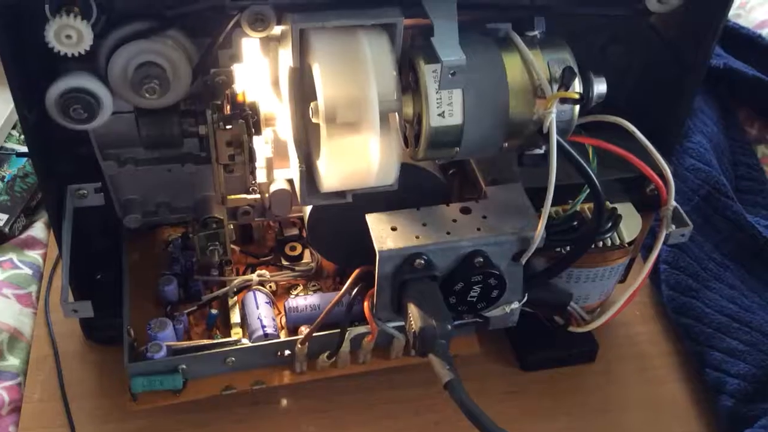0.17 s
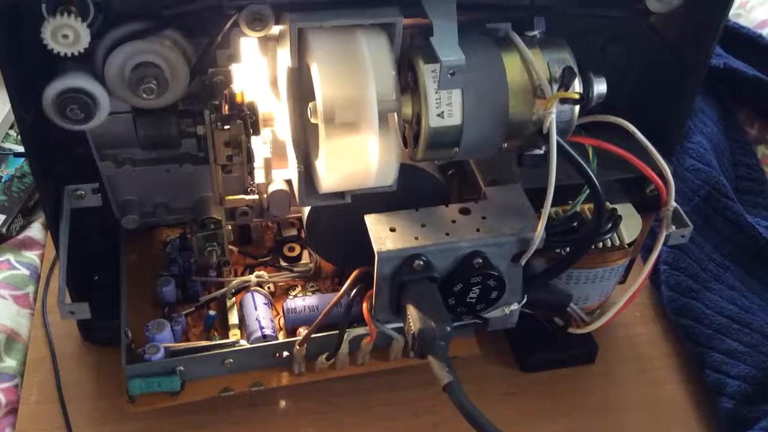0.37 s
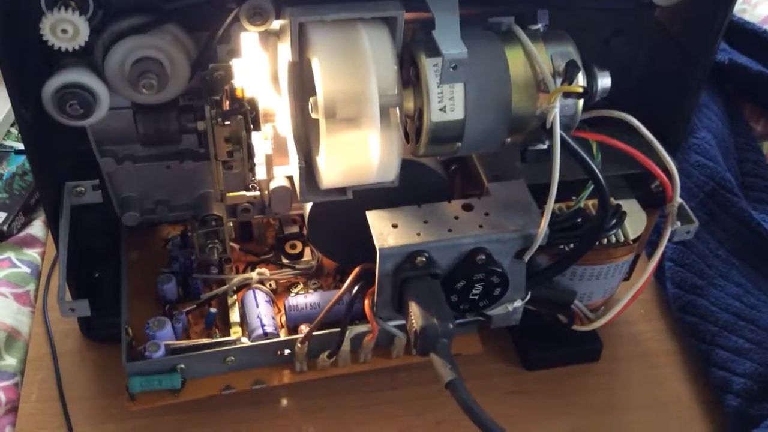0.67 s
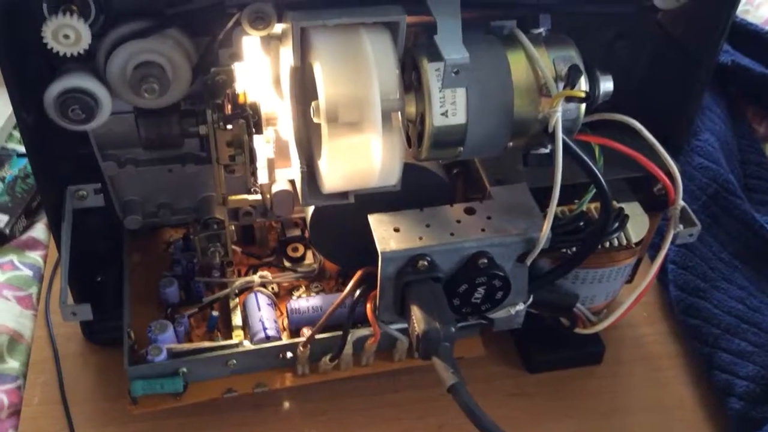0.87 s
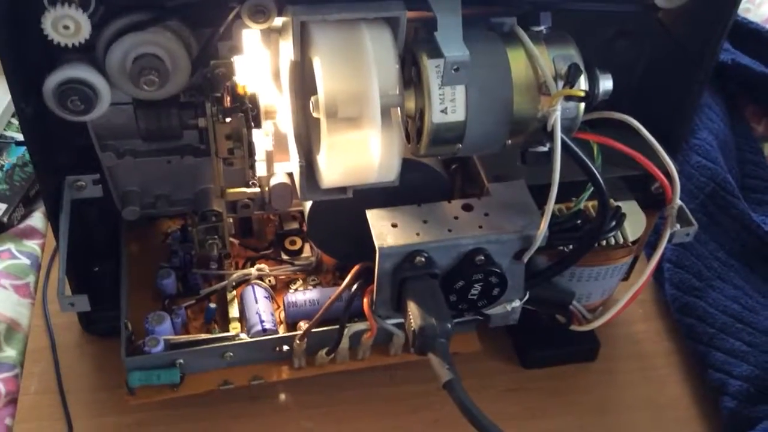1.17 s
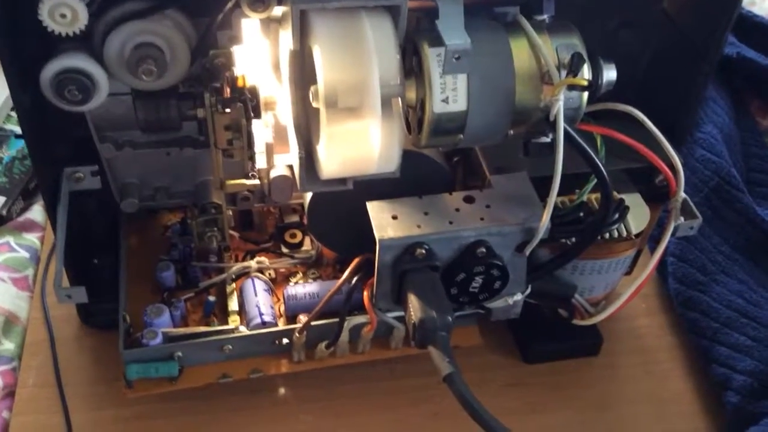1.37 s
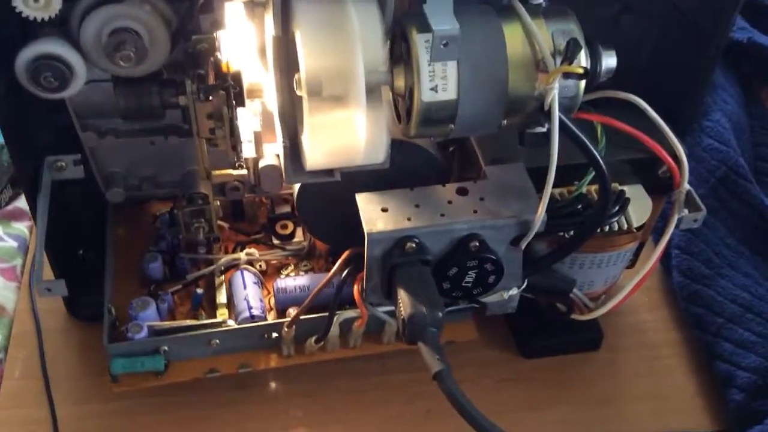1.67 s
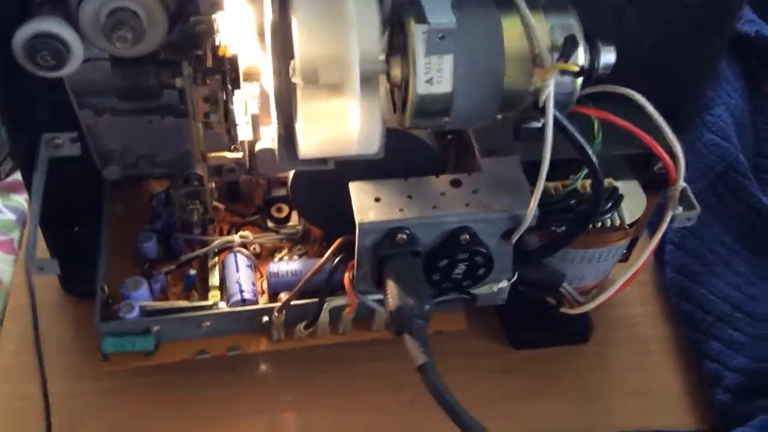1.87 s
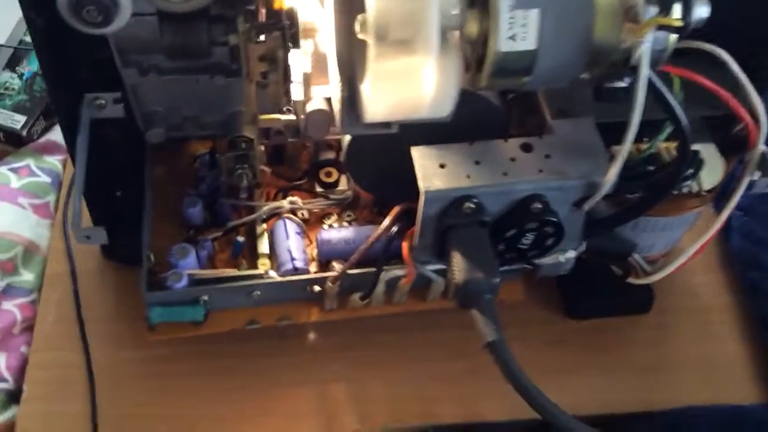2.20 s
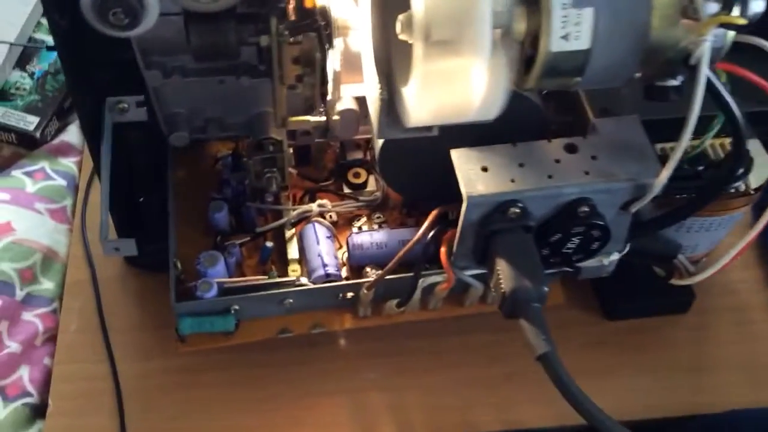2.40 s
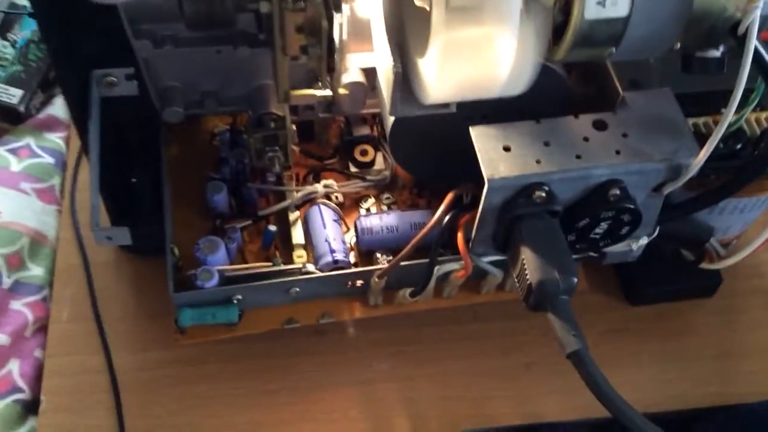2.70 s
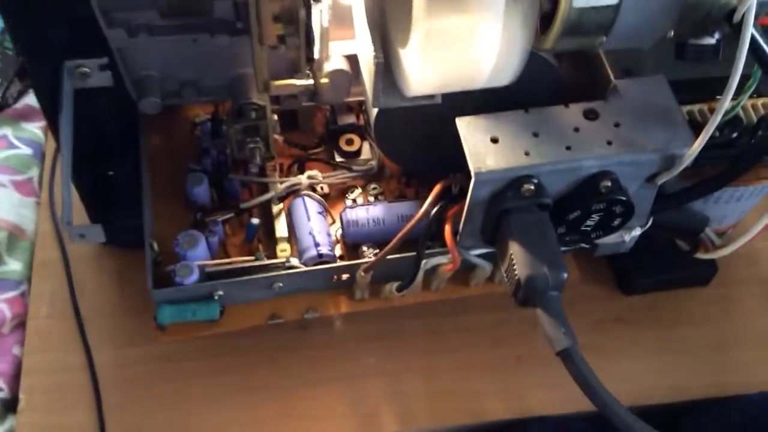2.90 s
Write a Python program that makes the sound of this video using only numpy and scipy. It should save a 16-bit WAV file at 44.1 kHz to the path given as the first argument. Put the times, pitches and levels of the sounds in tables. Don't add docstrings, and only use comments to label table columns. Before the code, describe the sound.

An open film projector chatters rapidly and evenly, about 24 bright metallic clicks a second, over gear whine, cam rumble and fan hiss; small room, close phone microphone moving nearer near the end.

```python
import sys
import numpy as np
from scipy import signal
from scipy.fft import rfft, irfft
from scipy.io import wavfile
from scipy.ndimage import uniform_filter1d, map_coordinates

SR = 44100
rng = np.random.default_rng(int(sys.argv[2]) if len(sys.argv) > 2 else 0)


def field_ratio(decibels):
    return 10 ** (np.asarray(decibels, dtype=float) / 20)


def wav_record(signal):
    frames = np.transpose(np.atleast_2d(signal))
    bounded = np.clip(frames, -1, 1)
    quanta = np.round(bounded * 32767).astype(np.int16)
    wavfile.write(sys.argv[1], SR, quanta)


N = 134505
TURN_S = .0419177


def level(x, db):
    return x * field_ratio(db) / np.sqrt(np.mean(x ** 2))


def ring(x, hz, t60):
    radius = np.exp(-np.log(1000) / (t60 * SR))
    angle = 2 * np.pi * hz / SR
    return signal.lfilter([1, 0, -1], [1, -2 * radius * np.cos(angle), radius * radius], x)


def colour(x, points):
    hz, db = np.transpose(points)
    f = np.fft.rfftfreq(len(x), 1 / SR) + 1
    return irfft(rfft(x) * field_ratio(np.interp(np.log(f), np.log(hz), db)), len(x))


def walk(rate):
    hold = int(SR / rate)
    steps = np.repeat(rng.standard_normal(N // hold + 1), hold)
    return 1.5 * uniform_filter1d(uniform_filter1d(steps, hold), hold)[:N]


# multiple of the tooth rate, level in dB rms.
WHINE = [(1, -55), (2, -70.5)]


def gear_whine(turn, near):
    teeth = 43
    out = np.zeros(N)
    for multiple, db in WHINE:
        swell = field_ratio(db + 2.5 + 4.6 * near + 0.72 * walk(16))
        out += swell * np.sin(2 * np.pi * multiple * teeth * turn)
    return out


# pitch in Hz, level in dB rms, width in Hz.
MOTOR = [(1075.3, -64, 8), (4950, -63, 130), (5750, -66, 140), (3050, -70, 90), (3520, -70, 90),
         (6950, -69, 90)]


def motor():
    out = np.zeros(N)
    for hz, db, width in MOTOR:
        t60 = np.log(1000) / np.pi / width
        out += level(ring(rng.standard_normal(N), hz, t60), db)
    return out


# frequency in Hz, level in dB per Hz.
CAMS = [(250, -21), (370, -4), (480, -16.5), (620, -4.5), (770, -9.5), (930, 2), (1300, -15), (2600, -21.5)]


def cam_rumble(turn, near):
    played = []
    for _ in range(2):
        outline = colour(irfft(np.exp(2j * np.pi * rng.random(925))), CAMS)
        played.append(map_coordinates(outline, [turn % 1 * len(outline)], mode="grid-wrap"))
    return level(played[0] + 0.22 * walk(4.77) * played[1], -51.5) * field_ratio(3.6 * near)


def drive(t, near):
    turn = t / TURN_S + 0.00098 * walk(5.2)
    return gear_whine(turn, near) + motor() + cam_rumble(turn, near)


# frequency in Hz, level in dB per Hz.
FAN = [(25, 2), (50, -0.5), (190, 0.5), (280, -4.5), (1400, -6), (2300, -11.5), (6000, -14), (15500, -19.5)]


def fan():
    air = rfft(colour(rng.standard_normal(N), FAN))
    octave = np.log2(np.fft.rfftfreq(N, 1 / SR) + 1)
    out = np.zeros(N)
    for centre in range(4, 16):
        band = np.clip(1 - abs(octave - centre), 0, 1) ** .5
        out += field_ratio(1.4 * walk(24.88)) * irfft(air * band, N)
    return level(out, -50)


# time in ms after the strike, level in dB.
CONTACTS = [
    (-.9, -18),
    (-.4, -9),
    (-.05, 0),
    (.45, 0),
    (1., -5),
    (1.6, -3),
    (3.1, -9),
    (4.4, -14),
    (5.5, -14),
    (7.3, -15),
]


def strikes():
    first_s, wander_s = .0947, .00008
    contact_ms, slide_ms, slide_db, scatter_db = .16, 2.4, -29, 1.
    same_share = .85
    lift_db_per_ms = .6

    ms = np.arange(-256, 512) * 1000 / SR
    turns = int(N / SR / TURN_S) + 1
    chance = rng.standard_normal((turns, len(CONTACTS)))
    env = field_ratio(slide_db) * np.exp(-abs(ms) / slide_ms)
    for k, (at, db) in enumerate(CONTACTS):
        bounce = np.exp(-((ms - at) / contact_ms) ** 2)
        env = env + field_ratio(db + scatter_db * chance[:, k:k + 1]) * bounce

    same = np.sign(rng.standard_normal(len(ms)))
    drift = np.sqrt(2) * uniform_filter1d(rng.standard_normal(env.shape), size=2, axis=0)
    force = env * (np.sqrt(same_share) * same + np.sqrt(1 - same_share) * drift)
    lift_db = np.array([0 * ms, lift_db_per_ms * np.clip(ms, -2, 8)])
    force = force[:, None] * field_ratio(lift_db)

    out = np.zeros((2, N + 4096))
    late = wander_s * walk(5)
    for k in range(turns):
        at = first_s + k * TURN_S
        i = int(round((at + late[min(int(at * SR), N - 1)]) * SR)) - 256
        out[:, i:i + len(ms)] += force[k]
    return out[:, :N]


def body(force, modes, near):
    out = np.zeros(N)
    for k, (hz, db, t60, gain_db) in enumerate(modes):
        swell = field_ratio(db + gain_db * near + 0.95 * walk(9.85))
        out += (-1) ** k * swell * level(ring(force, hz, t60), 0)
    return out


# pitch in Hz, level in dB, t60 in seconds, gain in dB when near.
CLAW = [(5560, -17, 0.0095, 15.5), (5920, -8.5, 0.015, 4.5), (6240, -8, 0.013, 4.5), (6596, 1, 0.0063, 1.5),
        (6930, 2.5, 0.01, -2.5), (7410, -9.5, 0.02, 5), (7857, -1.5, 0.0054, -3.5), (9620, -11, 0.0049, 6),
        (10580, -12, 0.0063, 7.5), (11610, -7, 0.0035, 3.5), (12380, -9, 0.0055, -2),
        (13500, -11, 0.0049, 5), (14100, -8.5, 0.0056, 0), (14700, -6.5, 0.0047, -2)]
FRAME = [(977, -15, 0.053, 10), (1530, -11, 0.027, 4), (2000, -14, 0.0074, 7.5), (2725, -13, 0.011, 5),
         (2950, -7, 0.066, -2.5), (3280, -6.5, 0.026, 4), (3558, -5.5, 0.02, 1.5), (3970, -9.5, .014, 3),
         (4527, -5, 0.013, 0), (4930, -6.5, 0.024, 3.5), (5350, -10, 0.0071, -2)]


def clatter(near):
    force, shake = strikes()
    claw = field_ratio(-46) * body(force, CLAW, near)

    frame_late_ms = 0.772
    late = map_coordinates(shake, [np.arange(N) - frame_late_ms * SR / 1000], order=1)
    no_bass = signal.butter(2, 700, "highpass", fs=SR, output="sos")
    frame = field_ratio(-51) * signal.sosfilt(no_bass, body(late, FRAME, near))

    crack_hz = 11060
    crack_band = signal.butter(2, [crack_hz * .4, crack_hz * 1.33], "bandpass", fs=SR)
    crack = level(signal.lfilter(*crack_band, force), -51.5)
    return claw + frame + crack


def room(hits, t):
    room_db, t60_s, rise_s = -14, 0.04, 0.0013
    t = t[:9000]
    tail = rng.standard_normal(9000) * field_ratio(-60 * t / t60_s) * np.clip(t / rise_s, 0, 1)
    return signal.fftconvolve(hits, level(tail, room_db) / np.sqrt(9000))[:N]


# middle in seconds, length in seconds, level in dB, pitch in Hz.
HUMS = [
    (0.124, 0.064, -57.5, 122.5),
    (0.442, 0.084, -57, 125),
    (0.603, 0.056, -63, 161),
    (1.694, 0.027, -49, 180),
    (1.757, 0.024, -57, 185),
    (2.045, .12, -56, 180),
    (2.326, 0.096, -60.5, 170.3),
    (2.55, 0.032, -57, 180),
    (2.783, 0.045, -53, 180),
    (2.873, .05, -54, 185),
]


def table(t):
    out = np.zeros(N)
    for at, length, db, hz in HUMS:
        out += field_ratio(db + 4) * np.exp(-((t - at) / length * 2) ** 2) * np.sin(2 * np.pi * hz * t)

    bump_s, bump_ms, bump_db = 1.0157, .7, -34
    u = (t - bump_s) * 1000 / bump_ms
    push = np.exp(np.minimum(u, 0))
    recoil = np.exp(-(u * 3) ** 2) - .5 * u * np.exp(-np.maximum(u, 0))
    return out + field_ratio(bump_db) * np.where(u < 0, push, recoil)


# time in seconds, nearness from 0 to 1, level in dB.
NEAR = [
    (0, 0, -0.5),
    (.8, 0.2, .5),
    (1.5, 0, 0),
    (2.2, 0.2, 0.5),
    (2.45, 0.58, 0),
    (2.7, 1, -0.5),
    (2.85, 0.85, 0.5),
    (3.05, .6, 1),
]


def scene():
    t = np.arange(N) / SR
    at, nearness, level_db = np.transpose(NEAR)
    near = np.interp(t, at, nearness)
    hits = clatter(near)
    machine = hits + room(hits, t) + drive(t, near) + fan()
    return (machine * field_ratio(np.interp(t, at, level_db)) + table(t))[None]


def top_cut(x):
    return signal.sosfilt(signal.butter(12, 16460, fs=SR, output="sos"), x)


# centre in Hz, width in Hz, depth in dB.
PORT_DIPS = [(9100, 700, -5), (13100, 400, -9)]


def record(dry):
    start_s = .0838
    x = signal.sosfilt(signal.butter(3, 42, "highpass", fs=SR, output="sos"), dry)
    x = x * (np.arange(N) > start_s * SR)
    for hz, width, db in PORT_DIPS:
        x = x - (1 - field_ratio(db)) * signal.lfilter(*signal.iirpeak(hz, hz / width, fs=SR), x)
    x = signal.sosfilt(signal.ellip(5, .5, 14, 15130, fs=SR, output="sos"), x)
    x = signal.sosfilt(signal.butter(7, 15500, fs=SR, output="sos"), x)
    return top_cut(x)


dry = scene()
out = record(dry)
wav_record(out)
```